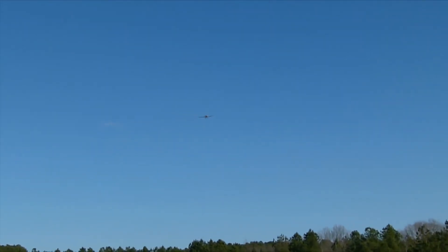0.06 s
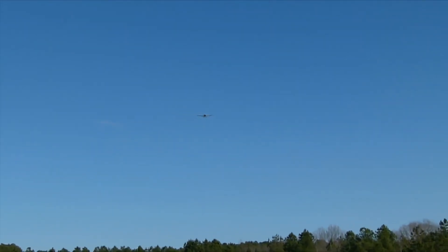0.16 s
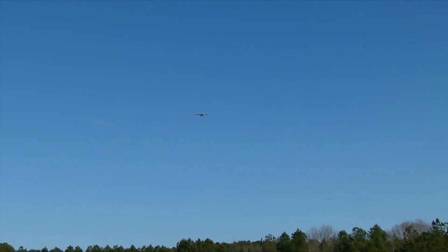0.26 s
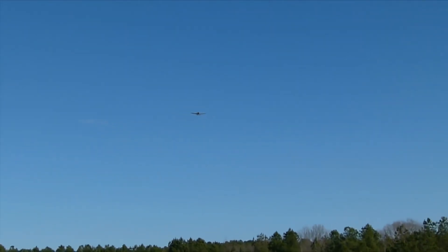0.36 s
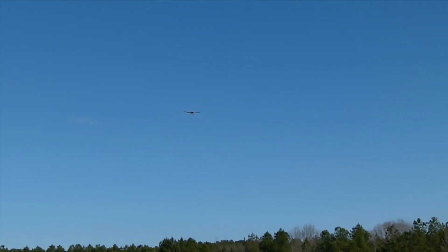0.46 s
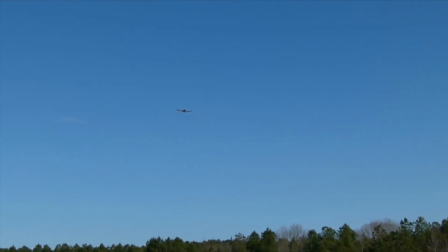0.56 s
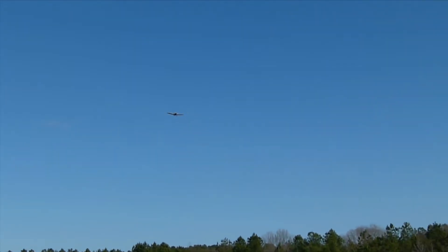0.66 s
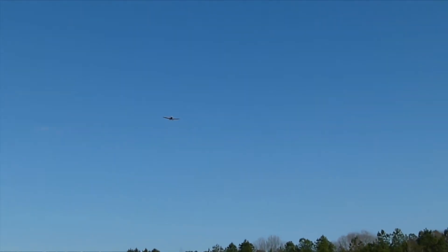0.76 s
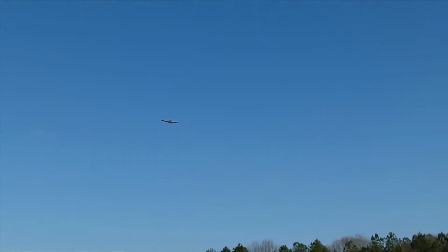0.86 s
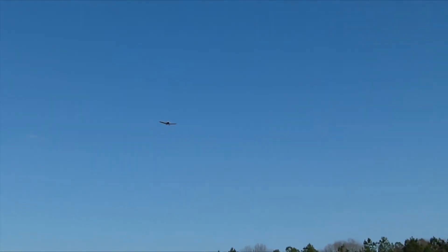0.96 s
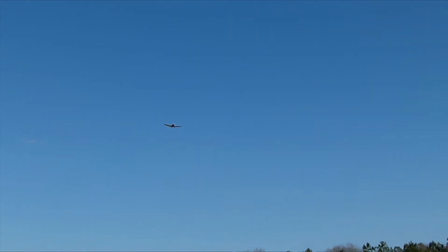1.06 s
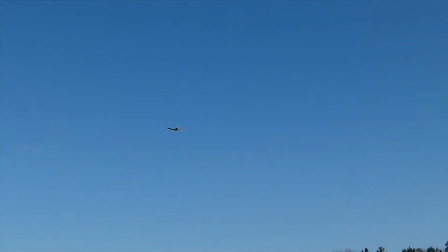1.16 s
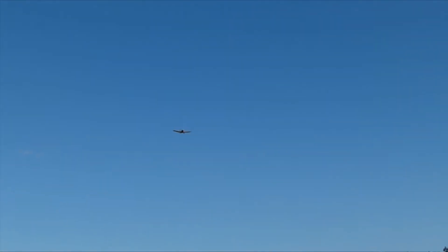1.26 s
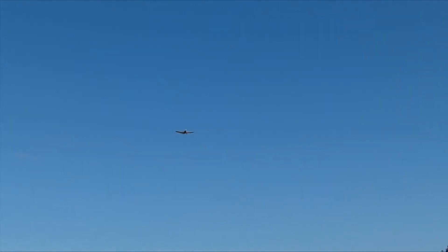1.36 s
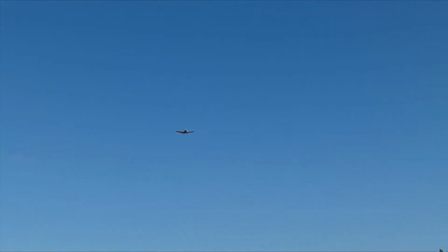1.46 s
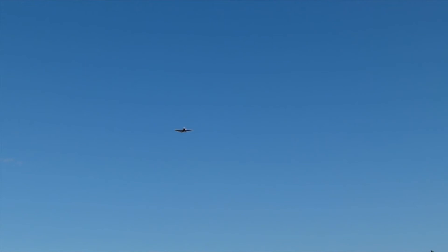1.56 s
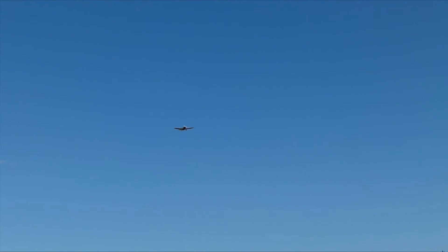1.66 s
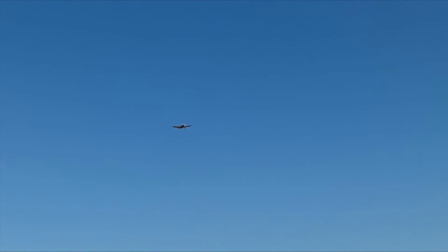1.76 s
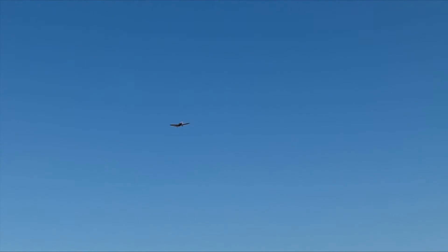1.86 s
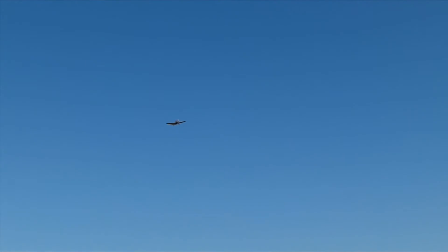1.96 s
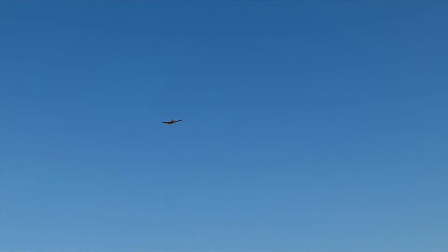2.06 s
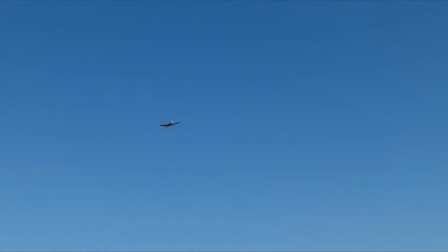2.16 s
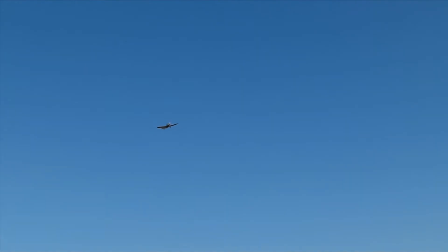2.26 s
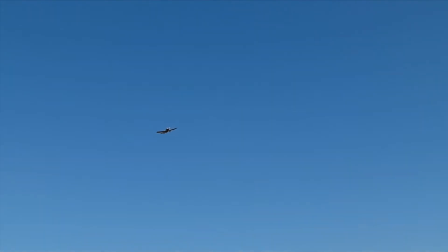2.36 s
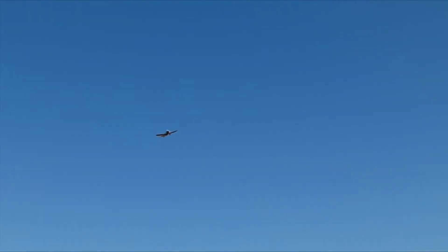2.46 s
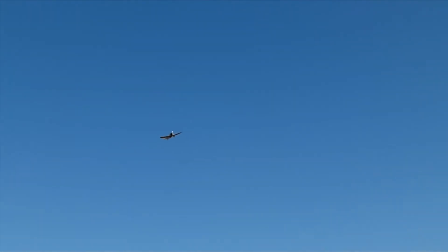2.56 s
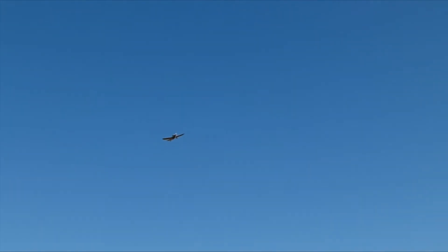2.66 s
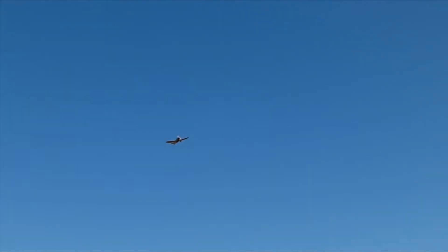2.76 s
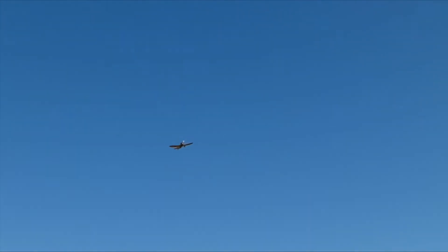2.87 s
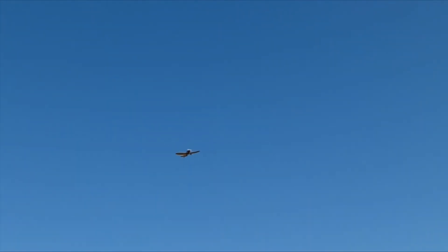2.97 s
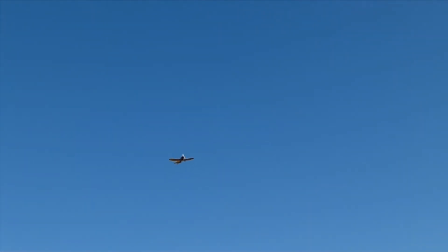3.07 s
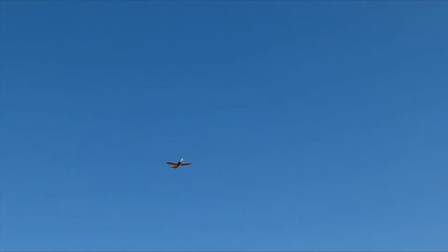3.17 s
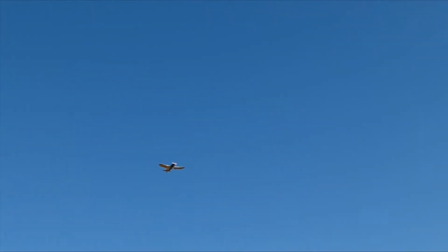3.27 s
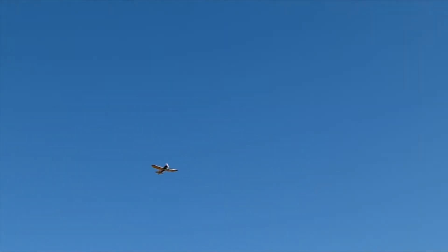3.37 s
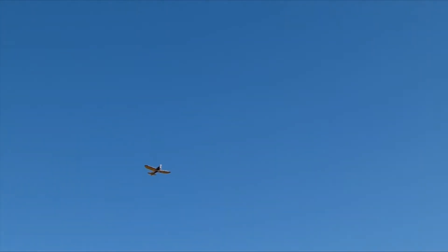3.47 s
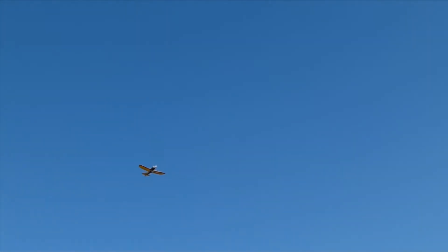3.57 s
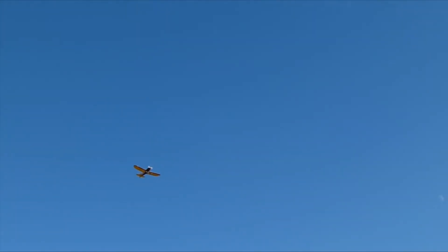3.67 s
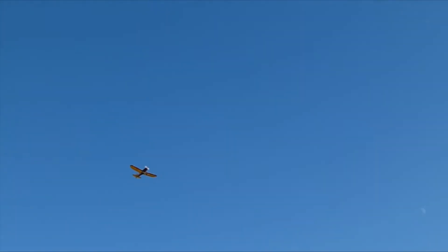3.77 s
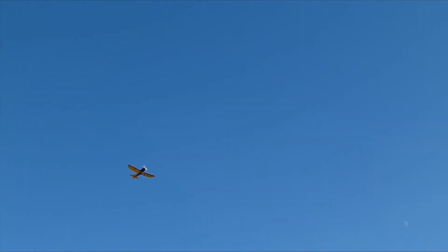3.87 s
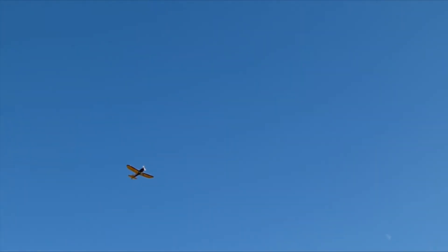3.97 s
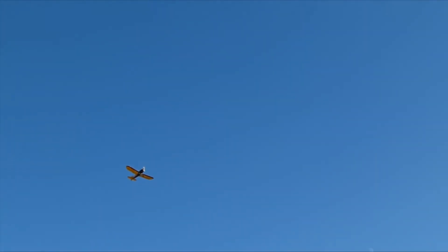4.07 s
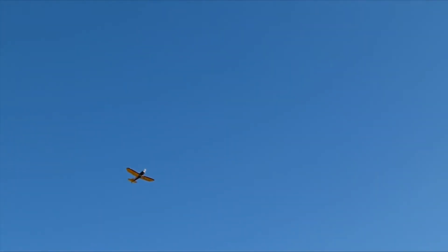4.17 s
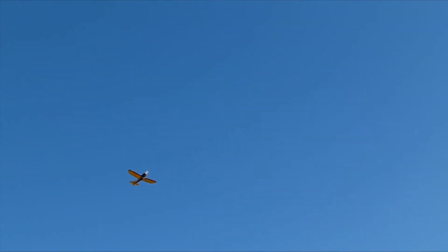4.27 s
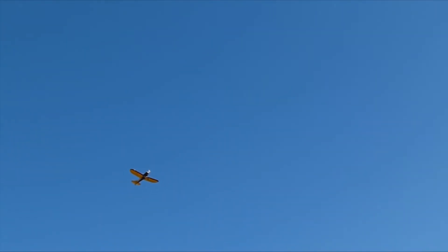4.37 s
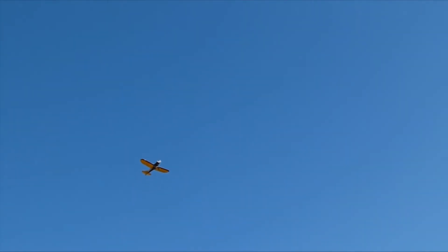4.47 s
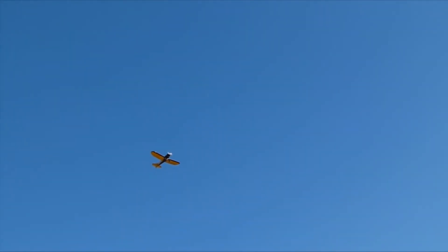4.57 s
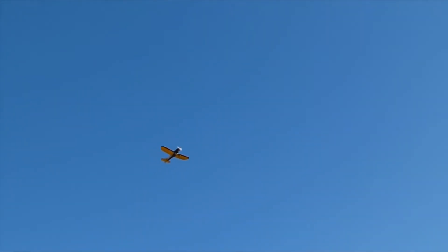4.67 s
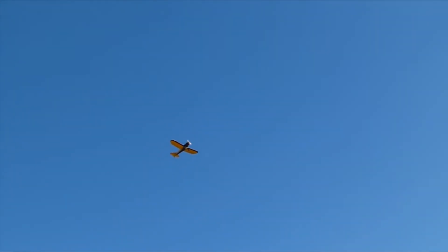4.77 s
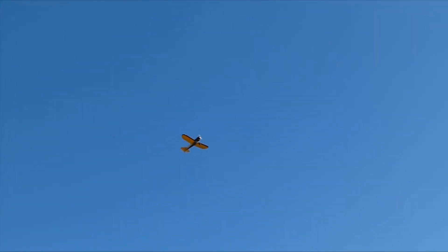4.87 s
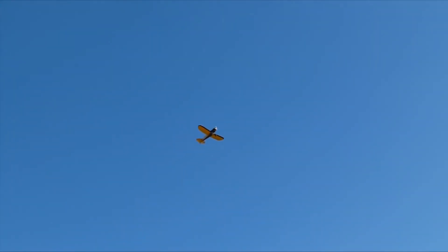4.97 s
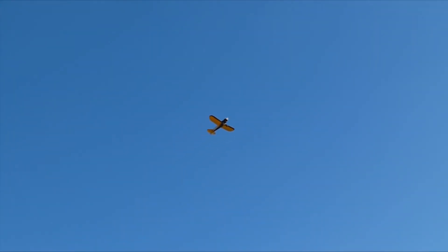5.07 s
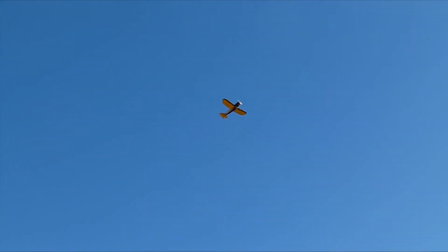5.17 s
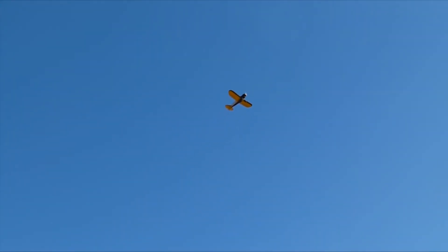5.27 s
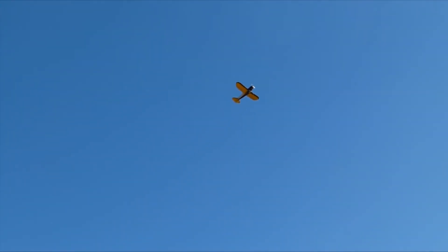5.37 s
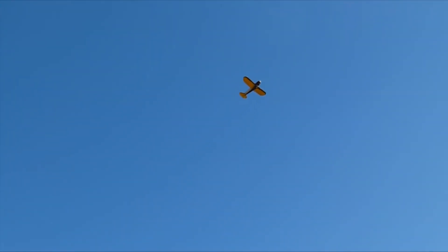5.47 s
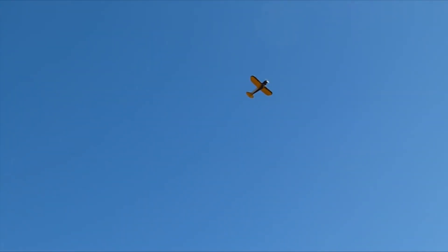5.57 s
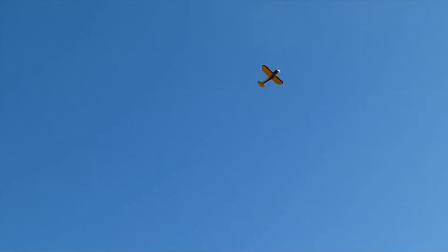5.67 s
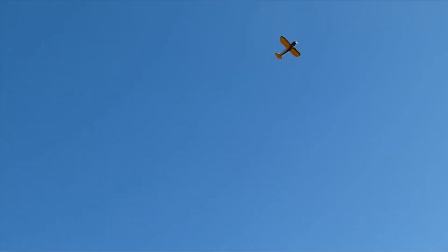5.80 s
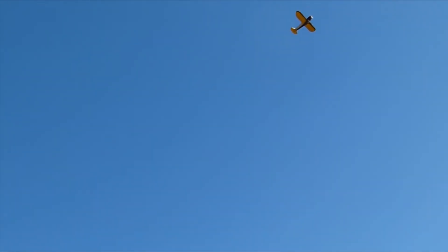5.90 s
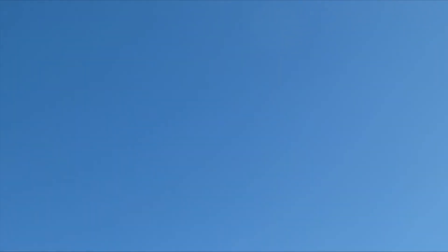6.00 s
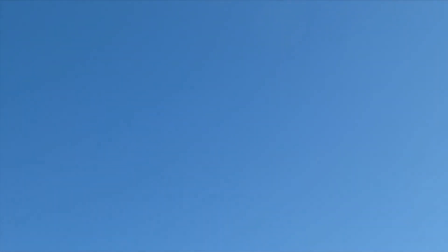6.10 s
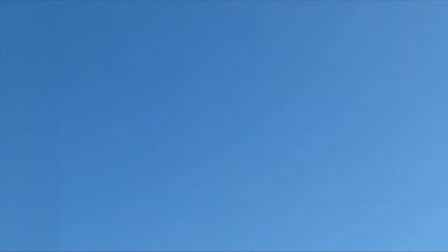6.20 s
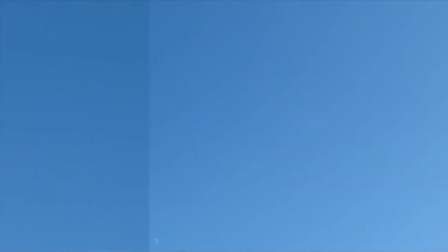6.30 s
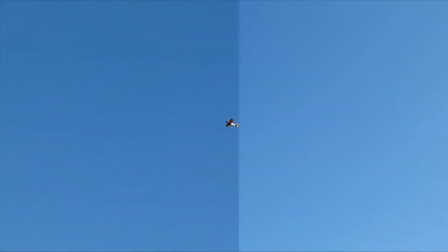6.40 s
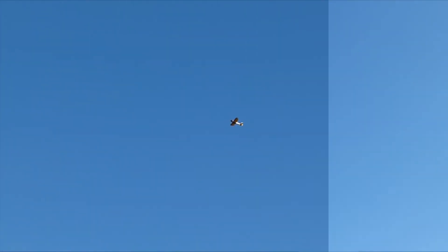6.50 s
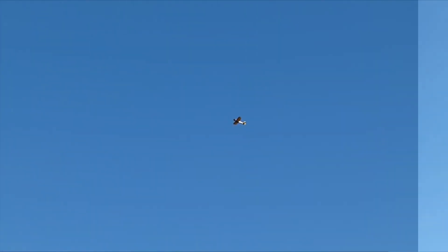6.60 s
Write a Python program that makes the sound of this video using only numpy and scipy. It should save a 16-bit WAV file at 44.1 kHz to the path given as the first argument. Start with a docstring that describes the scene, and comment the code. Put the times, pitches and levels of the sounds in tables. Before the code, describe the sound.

A small single-cylinder two-stroke model aeroplane is already flying at 0 s and buzzes without pause to the end, about 6.6 s. The note is a rapid, nasal drone of some 113 firings a second, rich in overtones, each firing giving a snap and puff. It rises slightly to about 118 by 2 s, then eases down. From 2.5 s it grows louder, its raspy treble flickering in moving air and its tone shifting as sound reflected off the ground mixes in. Faint dry ticks fall between 2.7 and 3.1 s. Around 4.6 s the rasp is strong and hissy; a soft tap and brighter clicks come near 5 to 5.1 s. The pitch sinks to about 102 as the plane climbs past. From 6 s grainy hand rustle, knocks and clicks strike the close handheld stereo microphone. Low hiss and very light wind remain underneath, in open air.

```python
"""A model aeroplane with a one-cylinder two-stroke engine nears and climbs past a hand-held camera in a field.
Its buzz, a pulse, snap and puff at each firing, comes straight and off the ground; moving air flickers the treble.
The note rises until about 2 s; faint ticks, short tones that set the shell ringing, follow before and after 3 s.
The pitch then falls as the bounce comes later; brighter ticks and a tap sound near 5 s.
From 6 s the turning camera rustles as grainy noise with taps; hiss and light wind, both noise, lie beneath."""
import sys
import numpy as np
from scipy import signal
from scipy.fft import rfft, irfft
from scipy.io import wavfile
from scipy.ndimage import uniform_filter1d

SR = 44100
rng = np.random.default_rng(int(sys.argv[2]) if len(sys.argv) > 2 else 0)


def store_wav(level_fs):
    """Save 16-bit WAV to argv[1]."""
    pcm = np.round(np.clip(np.atleast_2d(level_fs), -1, 1) * 32767)
    wavfile.write(sys.argv[1], SR, pcm.T.astype(np.int16))


N = 292823

# the flight as heard: start_s, firing_rate_hz, straight_path_db, ground_path_db
FLIGHT = [(0.0, 112.7, -39, -33.4), (0.2, 113.3, -38, -33.8), (0.55, 114.3, -27.4, -31.6),
          (0.9, 115.2, -28.4, -34.2), (1.14, 115.0, -27.7, -33.9), (1.5, 116.3, -25.8, -33),
          (1.98, 118.2, -29.5, -34.6), (2.39, 117.2, -25.8, -31.5), (2.7, 115.4, -23.5, -27),
          (3.08, 113.9, -27, -22.5), (3.5, 113.9, -30.0, -25.9), (3.78, 114.0, -27.2, -27.2),
          (4.06, 114.1, -23.7, -25.6), (4.4, 113.1, -26.8, -24), (4.63, 113.4, -23.0, -21.6),
          (4.93, 111.7, -21.0, -20.0), (5.06, 111.0, -24.0, -22.6), (5.24, 111.1, -23.1, -20.6),
          (5.6, 107.8, -31.5, -18.3), (5.94, 105.7, -27.0, -16.2), (6.3, 103.2, -31, -17.4),
          (6.55, 102.2, -31, -18), (6.64, 102.0, -34, -22)]
# exhaust note by multiple of the firing rate: order, towards_camera_db, towards_ground_db
EXHAUST_ORDERS = [(3, -13, -19.5), (4, -10, -5), (5, -14, -8), (6, -12.5, -13), (7, -8, -7), (8, -5, -11),
                  (9, -8.5, -16), (10, -21, -15), (11, -25, -13.5), (12, -12, -17), (13, -13, -30),
                  (14, -31, -21), (15, -21, -21), (16, -39, -25), (17, -31, -28), (18, -28, -31),
                  (19, -24.5, -34), (20, -19, -38), (21, -17, -34), (22, -28, -36)]
# the aeroplane climbs, so the way over the ground gets longer: start_s, extra_travel_ms
GROUND_DELAY = [(0, 3.8), (1.16, 3.72), (1.5, 3.51), (1.8, 3.73), (2.7, 3.79), (4.2, 4.62), (4.55, 5.28),
                (5.06, 5.6), (5.47, 6.13), (6.64, 6.19)]
# balance of the note: start_s, low_orders_db, top_orders_db (both beside the rest)
NOTE_BALANCE = [(0, -4, .6), (1.2, -.5, .6), (2, 3, .6), (2.6, 3, -.6), (3.1, 3, -4), (4.8, 2.5, -5),
                (5.6, 0, -1.5), (6.3, -4, .6), (6.64, -3, .6)]
# orders that swell and fade on their own
WANDERING_ORDERS = (3, 4, 7, 9, 10, 11)
# their swells: start_s, then one level_db for each wandering order
ORDER_SWELLS = [(0, 4, 3, -2.2, -3, 5, 1), (.7, .8, -1, -2.5, .2, 4.5, 4), (1.2, 2.2, 1, -1.2, 4, 4, 3),
                (1.65, 3, 1, -1.5, 2.2, -4, 1), (2.1, 3, -3, .2, .2, -5, 0), (2.5, .2, -1, .8, -3, -8, 3),
                (2.8, -2.2, -2, .2, -3, -5, 1), (3.1, -2.2, 0, .8, 4, 2.2, 0), (3.4, -2.2, 2, .2, 3, -7, 0),
                (3.75, -5, 0, 6, 4, -4.5, 2), (4, -6, 0, -.8, 1.2, -1.2, -4), (4.3, 3, 1, .2, .2, .2, -2),
                (4.6, 1.2, -1, -2.2, -9, -2.2, -3), (5, 2.2, -3, .8, -5, 4, -4),
                (5.5, 3, -1, 1.8, -7, .8, 3), (6.1, 2.2, -1, 2.2, .2, 3, -1), (6.64, 5, 0, 4, 3, 3, -5)]
# hums under the note: start_s, shaft_turn_db, two_blade_propeller_beat_db
HUMS = [(0.0, -70, -51), (1.0, -73, -51), (2.35, -77, -50), (3.86, -82, -36), (4.55, -65, -33),
        (4.99, -65, -36), (5.2, -61, -34), (5.73, -61, -46), (6.5, -65, -41), (6.64, -66, -44)]
# resonances of silencer and intake: pitch_hz (before PASSING), width_hz, level_db, snap_share (0-1, before PASSING)
RESONANCES = [(2370, 210, -5, .68), (3200, 300, -10, .5), (3930, 190, 1, .72), (4250, 380, -2, .62),
              (5560, 350, -21, .45), (8150, 550, -18, .65)]
# the aeroplane stops nearing: start_s, resonance_pitch_factor, broad_hiss_db (beside the resonances), snap_factor
PASSING = [(0, 1., -7, 1.), (2.2, 1., -6, 1.), (3.3, .995, -4, .9), (4.6, .985, 0, .7), (5.5, .96, -.6, .7),
           (6.64, .93, .8, .65)]
# broad colour of the treble: pitch_hz, level_db (per Hz)
TREBLE_COLOUR = [(1500, -35), (2000, -12), (2700, -12), (3500, -14), (4700, -20), (5600, -21), (6300, -31),
                 (10000, -48), (12500, -39), (14200, -43), (15500, -65)]
# treble bands: low_edge_hz, high_edge_hz
TREBLE_EDGES = [(1950, 3450), (3450, 5500), (5500, 7200), (7200, 9000), (9000, 15700)]
# for each treble band: offset_db (beside its level), flicker_db, shared_by_ports (0-1)
TREBLE_BANDS = [(-.5, 2., .95), (.3, 1., .87), (-.6, 2., .75), (0, 3., .6), (.5, 4., .4)]
# silencer, the lowest treble band: start_s, level_db (before the band's offset)
SILENCER_LEVEL = [(0.0, -48), (0.02, -43), (0.61, -40), (0.79, -46), (1.35, -40), (2.18, -42), (2.77, -36),
                  (2.94, -45), (3.29, -36), (3.53, -48), (3.88, -39), (4.33, -38), (4.4, -51), (4.59, -33),
                  (5.73, -40), (5.95, -38), (6.21, -42), (6.64, -38)]
# intake band, let through unevenly by moving air: start_s, level_db (before the band's offset)
INTAKE_LEVEL = [(0.0, -57), (0.2, -38), (0.43, -37), (0.57, -54), (0.72, -41), (0.96, -54), (1.14, -53),
                (1.27, -42), (1.72, -41), (1.81, -50), (2.11, -42), (2.7, -36), (2.92, -45), (3.23, -30),
                (3.75, -48), (3.88, -33), (4.0, -45), (4.2, -40), (4.46, -45), (4.66, -30), (4.68, -39),
                (4.92, -38), (4.97, -33), (5.2, -41), (5.21, -33), (5.44, -39), (5.46, -34), (5.59, -38),
                (5.6, -27), (5.66, -41), (5.94, -36), (6.18, -39), (6.21, -47), (6.32, -40), (6.64, -41)]
# fizz in the top three bands: start_s, low_db, middle_db, high_db (before the bands' offsets)
FIZZ_LEVELS = [(0.0, -69, -75, -74), (0.18, -62, -73, -70), (1.63, -60, -72, -72), (1.85, -66, -73, -70),
               (2.59, -55, -65, -73), (3.09, -61, -65, -71), (3.12, -51, -58, -69), (3.75, -63, -67, -72),
               (3.85, -49, -56, -69), (3.98, -58, -67, -71), (4.18, -51, -55, -66), (4.25, -56, -66, -72),
               (4.56, -53, -59, -59), (4.62, -44, -50, -55), (5.15, -50, -55, -56), (5.45, -53, -59, -72),
               (5.95, -49, -48, -63), (6.03, -57, -56, -70), (6.1, -50, -45, -55), (6.18, -53, -56, -59),
               (6.6, -53, -56, -69), (6.64, -48, -56, -59)]
# phase between the microphone ports: pitch_hz, left_lead_rad
PORT_PHASE = [(0, 0), (690, -.3), (1120, -1.1), (1550, .8), (2840, -.9), (3650, -1.4), (4480, -2.),
              (15300, -2.2)]
# level between the microphone ports: pitch_hz, left_minus_right_db
PORT_BALANCE = [(60, -0.5), (120, 0.0), (240, 0), (480, -1), (950, -2), (1890, 0.5), (3770, 1),
                (7520, -5.5), (15000, -1)]
# rustle of the hands: start_s, level_db
RUSTLE_LEVEL = [(5.95, -70), (6.08, -46), (6.2, -30), (6.25, -33), (6.45, -33), (6.54, -25), (6.64, -31)]
# colour of the rustle: pitch_hz, level_db (per Hz)
RUSTLE_COLOUR = [(120, -29.5), (250, -2), (900, -2.5), (1700, -4.5), (3000, -27), (6000, -45.5)]
# taps on the camera body: start_s, peak_db, ring_hz
TAPS = [(4.97, -33, 220), (6.09, -27, 300), (6.2, -23, 300), (6.205, -9, 850), (6.295, -16, 1050),
        (6.465, -24, 280), (6.197, -16, 800), (6.5195, -13, 2200), (6.536, -17, 320), (6.542, -7, 900)]
# ticks: start_s, peak_db, ring_hz, swell_cycles, shell_db (beside the peak)
TICKS = [(2.7304, -42, 6560, .7, -8), (2.8654, -42, 6530, .7, -8), (3.0124, -43, 7110, .7, -8),
         (3.1023, -36, 7660, .7, -12), (5.1262, -19, 3700, 2.5, -8), (5.1316, -23, 3600, 3.5, -14),
         (6.2965, -21, 4300, 1.2, -13), (6.36, -27, 3800, 1.2, -10), (6.4625, -21, 2800, 1.5, -30),
         (6.5195, -22, 4600, 1.2, -25)]
# what the camera's shell rings with at each tick: pitch_hz, level_db (beside the tick's shell level)
SHELL_MODES = [(6200, -4), (7800, -4), (9600, -6), (13000, -16)]
# colour of the background hiss: pitch_hz, level_db (per Hz)
HISS_COLOUR = [(30, -28), (90, -24), (170, -12.5), (300, -4.5), (800, -3), (1500, -12), (4000, -17.5),
               (8000, -41), (13800, -46), (15500, -70)]
# wind rumble: start_s, level_db (before an 11 dB lift)
WIND_LEVEL = [(0.0, -75), (0.45, -73), (1.8, -80), (2.9, -95), (3.5, -93), (4.9, -85), (5.1, -78),
              (5.85, -80), (6.3, -86), (6.64, -82)]


def aeroplane():
    """Hear the note straight and later off the ground, with hums, roar and rasp."""
    firing_hz, straight_db, ground_db = curves(FLIGHT)
    turns = 2 + np.cumsum(firing_hz) / SR
    luck = rng.standard_normal((int(turns[-1]) + 2, 2))
    _, forward_db, downward_db = np.transpose(EXHAUST_ORDERS)
    # moving air makes each path flutter in its own way, and the extra travel time waver
    lag_ms = curves(GROUND_DELAY)[0] + .04 * np.log(lumpy(.06, 8.))
    late_turns = turns - firing_hz * lag_ms / 1000
    straight = lumpy(.05, .8) * gain_of(straight_db) * exhaust(turns, forward_db, luck)
    bounced = lumpy(.04, .9) * gain_of(ground_db) * exhaust(late_turns, downward_db, luck)
    straight, bounced = voiced(straight, turns), voiced(bounced, turns)
    distance_gain = np.hypot(gain_of(straight_db), gain_of(ground_db))
    direct = straight + hums(turns) + roar(distance_gain)
    # the bounce arrives from below, so the ports hear it with another spread
    return ports(direct) + ports(bounced, spread=.8) + rasp(turns, late_turns)


def exhaust(turns, order_db, luck, uneven_db=.8, jitter_turns=.002):
    """One pressure pulse a turn; firings vary a little in strength and timing."""
    order = np.transpose(EXHAUST_ORDERS)[0].astype(int)
    outer_db = np.r_[order_db[0] - 30, order_db, order_db[-1] - 20]
    level_db = np.interp(np.arange(129), np.r_[0, order, 128], outer_db)
    lines = np.zeros(513, complex)
    lines[order] = causal(level_db)[order]
    pulse = -1024 / np.sqrt(2) * irfft(lines)  # each order has the RMS level of its line
    size, shift = (np.interp(turns - .25, np.arange(len(luck)), column) for column in luck.T)
    angle = (turns + jitter_turns * shift) % 1
    return gain_of(uneven_db * size) * np.interp(angle, np.arange(1024) / 1024, pulse, period=1)


def voiced(note, turns, bass_hz=620, top_hz=1800):
    """The balance of the note drifts as the exhaust points elsewhere; some orders wander alone."""
    filters = [signal.butter(2, bass_hz, fs=SR), signal.butter(3, top_hz, "highpass", fs=SR)]
    out = note.copy()
    for db, taps in zip(curves(NOTE_BALANCE), filters):
        out += (gain_of(db) - 1) * signal.filtfilt(*taps, note)
    for order, db in zip(WANDERING_ORDERS, curves(ORDER_SWELLS)):
        # unwind the order to 0 Hz, smooth away its neighbours and wind it back
        spin = np.exp(2j * np.pi * order * turns)
        alone = signal.oaconvolve(out / spin, np.hanning(1201) / 600, "same")
        out = out + (gain_of(db) - 1) * 2 * (alone * spin).real
    return out


def hums(turns):
    """The shaft turn and the two-blade propeller beat are sines at one and two cycles a turn."""
    levels = enumerate(curves(HUMS), start=1)
    return sum(np.sqrt(2) * gain_of(db) * np.sin(2 * np.pi * order * turns) for order, db in levels)


def roar(distance_gain):
    """Propeller and slipstream stir coloured noise that fades with distance like the note."""
    colour = [(150, -35), (300, -4.5), (900, 1.5), (2000, -12), (5000, -35)]  # pitch_hz, level_db per Hz
    return gain_of(-20.5) * distance_gain * coloured(rng.standard_normal(N), colour)


def rasp(turns, late_turns):
    """Each firing snaps and blows a puff of noise through the silencer and intake resonances."""
    snap, gate = firing_bursts(turns, late_turns)
    treble_db = curves(SILENCER_LEVEL) + curves(INTAKE_LEVEL) + curves(FIZZ_LEVELS)
    levels = [gain_of(level_db + offset_db) * lumpy(.04, flicker_db)
              for level_db, (offset_db, flicker_db, _) in zip(treble_db, TREBLE_BANDS)]
    pitch_factor, broad_db, snap_factor = curves(PASSING)
    # each resonance swells and fades on its own, and wavers in pitch
    swells = [lumpy(.02, 2.) for _ in RESONANCES]
    drifts = [pitch_factor * lumpy(.1, .08) for _ in RESONANCES]

    def piped(snap, puff, shares):
        """Snap and puff excite the resonances beside a broad hiss, then split into treble bands."""
        rung = np.zeros(N)
        for swell, drift, (hz, width_hz, db, share) in zip(swells, drifts, RESONANCES):
            crisp = share * snap_factor
            blown = crisp * snap + (1 - crisp) * puff
            narrow = resonate(blown, hz * drift, width_hz)
            rung += gain_of(db) * swell * resonate(narrow, hz * drift, 3 * width_hz)
        broad = .25 * snap + puff + gate * rng.standard_normal(N)
        sound = gain_of(broad_db) * coloured(broad, TREBLE_COLOUR) + rung
        return sum(part * level * band(sound, *edges)
                   for part, level, edges in zip(shares, levels, TREBLE_EDGES))

    shared, left, right = gate * rng.standard_normal((3, N))
    # part of the hiss is scattered and differs between the ports
    same = np.clip(np.transpose(TREBLE_BANDS)[2], 0, 1)
    apart = np.sqrt(1 - same ** 2)
    scattered = np.array([piped(left, left, apart), piped(right, right, apart)])
    return ports(piped(snap, shared, same)) + scattered


def firing_bursts(turns, late_turns, echo=.25, puff_turns=.25, steady=.38, snap_db=1.7, puff_db=2.2):
    """Each firing gives a softened click and a decaying noise gate, both repeated off the ground."""
    firing = turns.astype(int)
    luck = rng.standard_normal((firing[-1] + 1, 2))[firing].T
    size = gain_of(snap_db * luck[0])
    clicks = snaps(turns, size) + echo * snaps(late_turns, size)
    snap = evened(signal.lfilter(*signal.butter(2, 4500, fs=SR), clicks))
    puff = gain_of(puff_db * luck[1]) * np.exp(-(turns % 1) / puff_turns)
    late_puff = echo * np.exp(-(late_turns % 1) / puff_turns)
    return snap, evened(steady + puff + late_puff)


def snaps(turns, size):
    """One click at each whole turn, shared between two samples so that it falls at its exact place."""
    at = np.flatnonzero(np.diff(np.floor(turns))) + 1
    past = (turns[at] % 1) / (turns[at] - turns[at - 1])
    out = np.zeros(N)
    out[at], out[at - 1] = (1 - past) * size[at], past * size[at]
    return evened(out)


def resonate(x, hz, width_hz):
    """A gliding resonance: shift its pitch curve down to zero, smooth, and shift back."""
    spin = np.exp(2j * np.pi * np.cumsum(hz) / SR)
    r = np.exp(-np.pi * width_hz / SR)
    return evened((spin * signal.lfilter([1 - r], [1, -r], x / spin)).real)


def ports(x, spread=1):
    """Two microphone ports hear one source with their own phase and level; their mean keeps its level."""
    hz = np.fft.rfftfreq(N, 1 / SR)
    phase = spread * np.interp(hz, *np.transpose(PORT_PHASE))
    half = gain_of(read(PORT_BALANCE, hz) / 2) * np.exp(.5j * phase)
    return irfft(rfft(x) * np.array([half, 1 / half]) / abs(half + 1 / half) * 2, N)


def handling():
    """Hands rustle in uneven grains and tap the body; faint bright ticks join them."""
    grains = rng.standard_normal(N) * lumpy(.006, 2.5)
    rustle = coloured(grains, RUSTLE_COLOUR) * gain_of(curves(RUSTLE_LEVEL)[0])
    body = rustle + sum(ring(s, db, hz, .8) for s, db, hz in TAPS)
    body = signal.sosfilt(signal.butter(2, 150, "highpass", fs=SR, output="sos"), body)
    return ports(body + sum(tick(*row) for row in TICKS))


def tick(s, db, hz, cycles, shell_db, shell_s=.0004):
    """A snap of its own pitch that also sets the shell ringing."""
    shell = sum(ring(s, db + shell_db + mode_db, mode_hz, shell_s * mode_hz)
                for mode_hz, mode_db in SHELL_MODES)
    return ring(s, db, hz, cycles) + shell


def ring(s, db, hz, cycles):
    """A short tone that swells quickly from s, over the given cycles, and dies."""
    first = int(s * SR)
    age_s = np.clip(np.arange(first, min(first + SR // 10, N)) / SR - s, 0, None)
    u = age_s * hz / cycles  # 1 at the peak of the swell
    tone = gain_of(db) * np.e * u * np.exp(-u) * np.sin(2 * np.pi * cycles * u)
    return np.r_[np.zeros(first), tone, np.zeros(N - first - len(u))]


def background():
    """Far hiss, partly shared by the ports, and lumpy wind rumble."""
    noise = rng.standard_normal((2, N))
    hiss = gain_of(-48) * coloured(noise + .8 * noise[::-1], HISS_COLOUR) * lumpy(.1, 1.)
    gusts = rng.standard_normal((2, N))
    # pitch_hz, level_db per Hz
    rumble_colour = [(20, 2), (60, -1), (130, -1.5), (200, -1.5), (320, -26.5), (1000, -62)]
    rumble = coloured(gusts + .15 * gusts[::-1], rumble_colour)
    return hiss + gain_of(curves(WIND_LEVEL)[0] + 11) * rumble * lumpy(.04, 3.)


def gain_of(db):
    """Decibels to a linear gain."""
    return 10 ** (np.asarray(db) / 20)


def evened(x):
    """Scale to an RMS of one."""
    return x / np.sqrt(np.mean(x ** 2) + 1e-20)


def read(points, hz):
    """Read a table of (Hz, value) along a logarithmic pitch axis."""
    f, value = np.transpose(points)
    return np.interp(np.log(hz + 1), np.log(f + 1), value)


def curves(rows):
    """Draw each column after start_s as straight lines over the whole scene."""
    s, *columns = np.transpose(rows)
    return [np.interp(np.arange(N) / SR, s, column) for column in columns]


def causal(db):
    """Minimum-phase spectrum for levels given from zero to the top bin."""
    log_gain = np.log(gain_of(db))
    mirrored = np.r_[log_gain, log_gain[-2:0:-1]]
    return np.exp(log_gain - 1j * signal.hilbert(mirrored).imag[:len(db)])


def coloured(x, points):
    """Filter to a drawn spectrum and even the level."""
    taps = irfft(causal(read(points, np.fft.rfftfreq(2048, 1 / SR))))
    return evened(signal.oaconvolve(x, taps[None] if x.ndim > 1 else taps)[..., :N])


def band(x, lo_hz, hi_hz):
    """Keep one band of pitch and even its level."""
    sos = signal.butter(4, [lo_hz, hi_hz], "bandpass", fs=SR, output="sos")
    return evened(signal.sosfilt(sos, x))


def lumpy(span_s, depth_db):
    """A random gain of RMS depth_db that changes over span_s."""
    span = int(span_s * SR)
    wander = uniform_filter1d(uniform_filter1d(rng.standard_normal(N), span), span)
    return gain_of(depth_db * evened(wander))


def scene():
    """The aeroplane over the background, with the handling of the camera."""
    return aeroplane() + handling() + background()


def record(dry):
    """The bass cut against wind, then the band limit."""
    cut = signal.sosfilt(signal.butter(2, 110, "highpass", fs=SR, output="sos"), dry)
    limit = signal.firwin(2047, 15700, window=("kaiser", 9), fs=SR)
    return signal.oaconvolve(cut, limit[None], "same")


dry = scene()
out = record(dry)
store_wav(out)
```